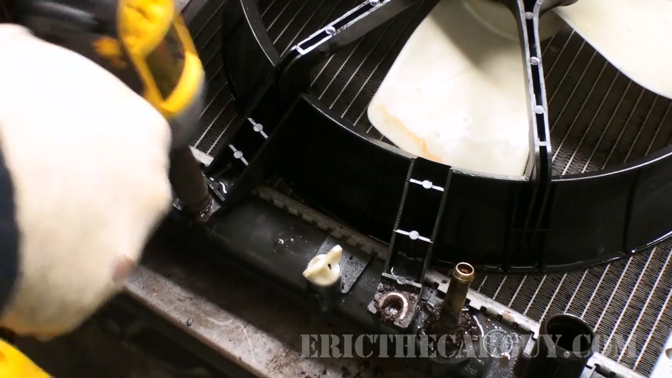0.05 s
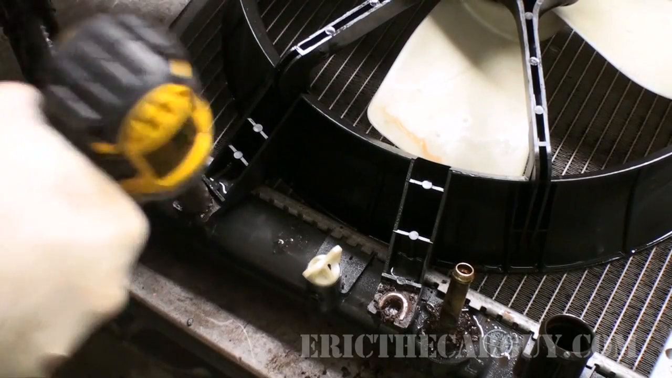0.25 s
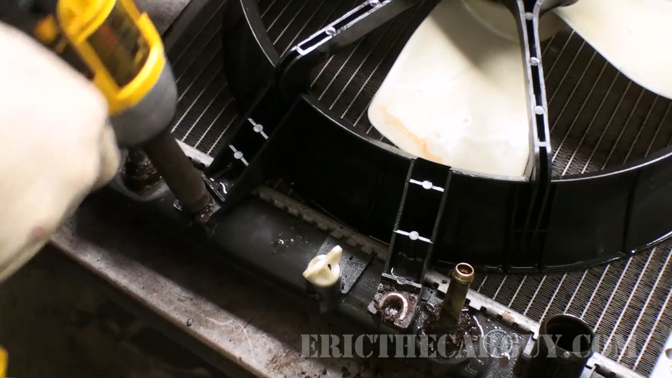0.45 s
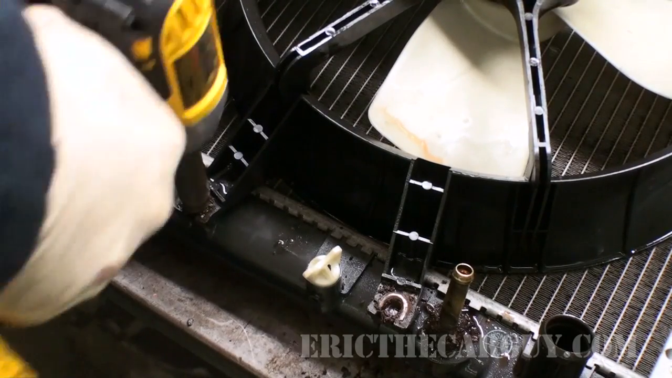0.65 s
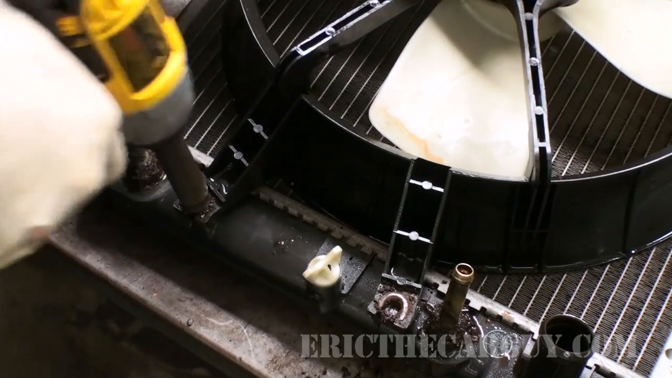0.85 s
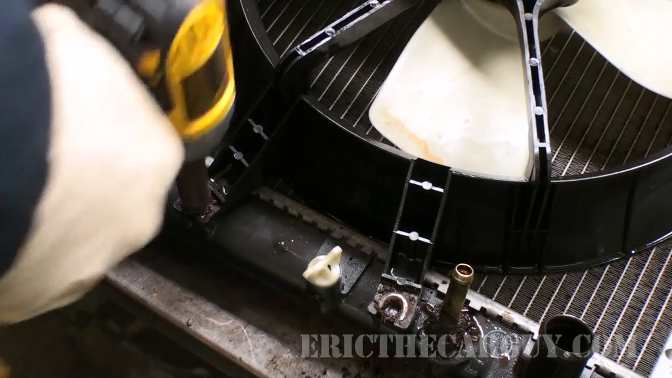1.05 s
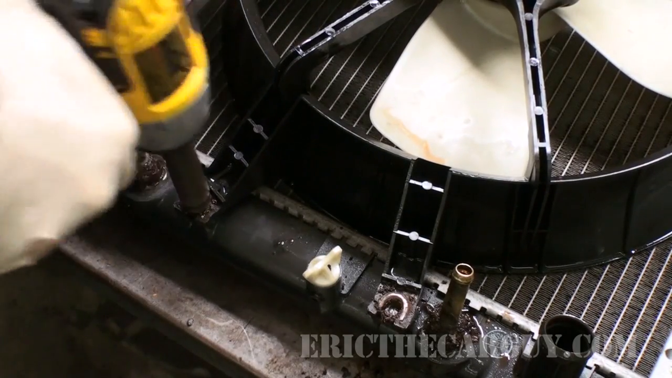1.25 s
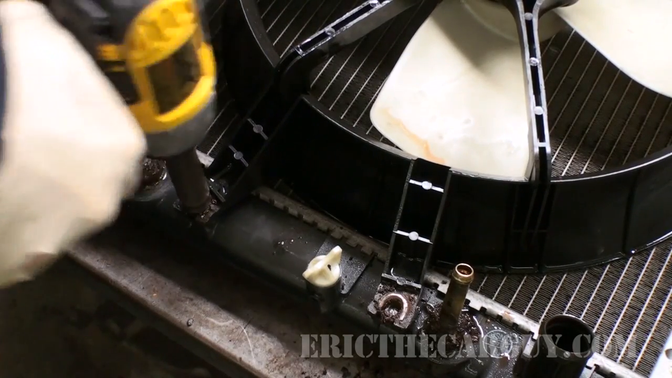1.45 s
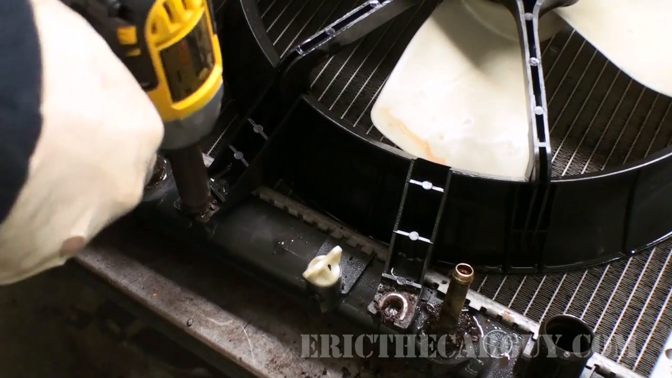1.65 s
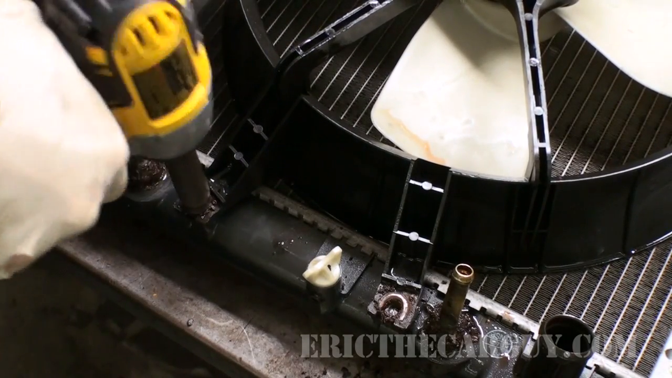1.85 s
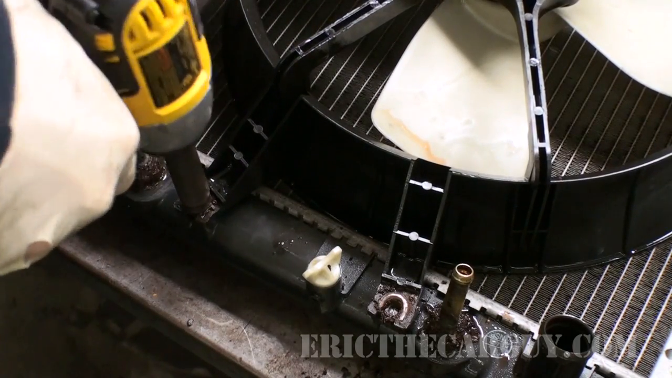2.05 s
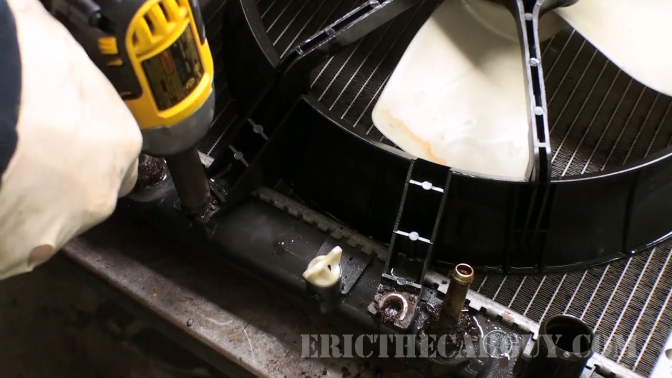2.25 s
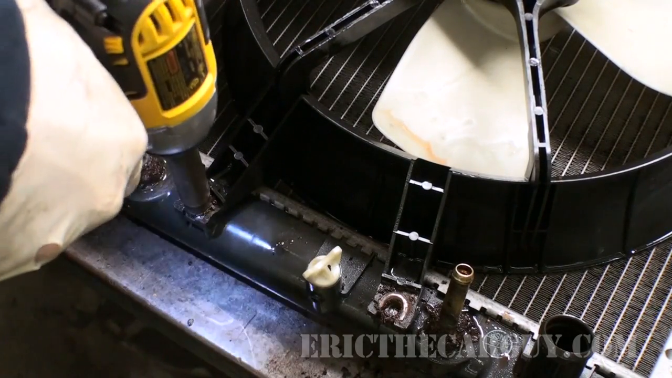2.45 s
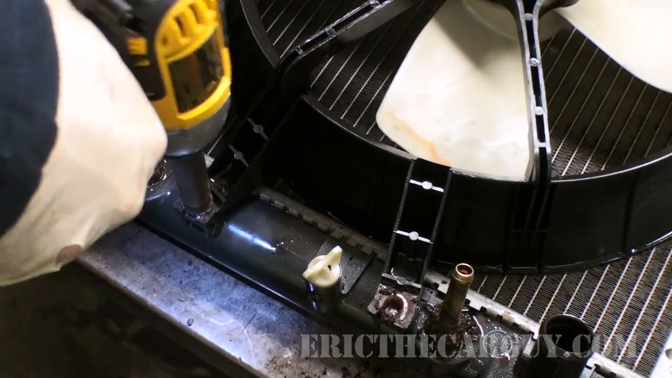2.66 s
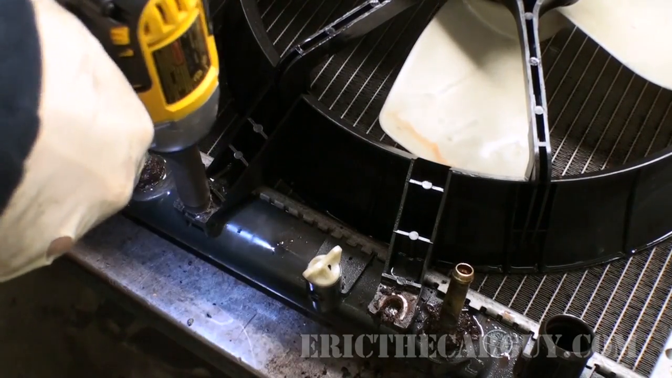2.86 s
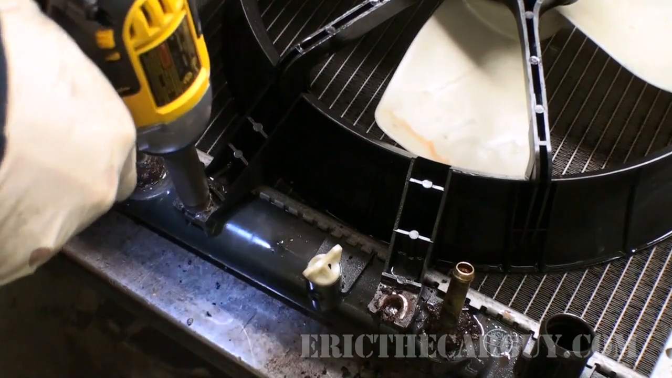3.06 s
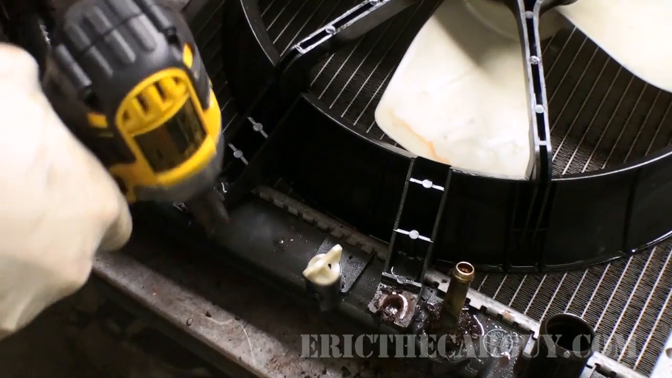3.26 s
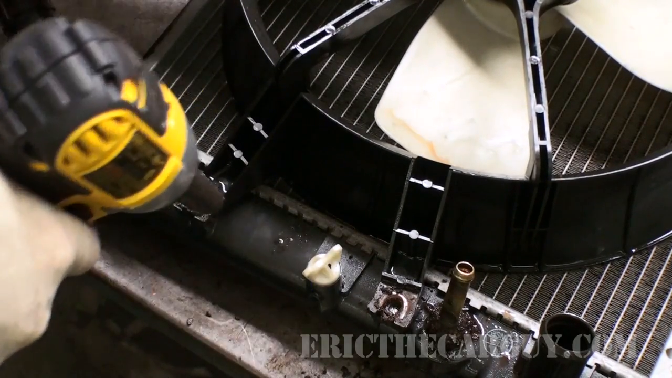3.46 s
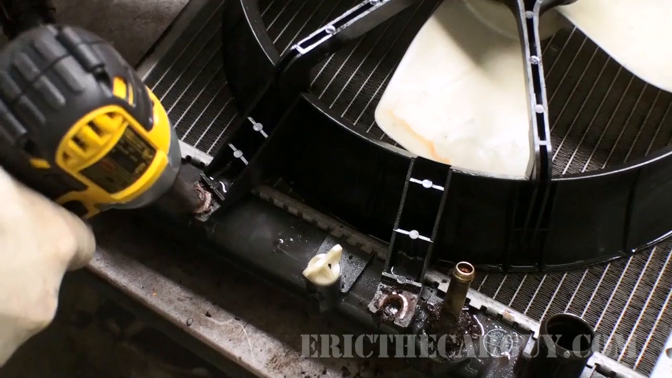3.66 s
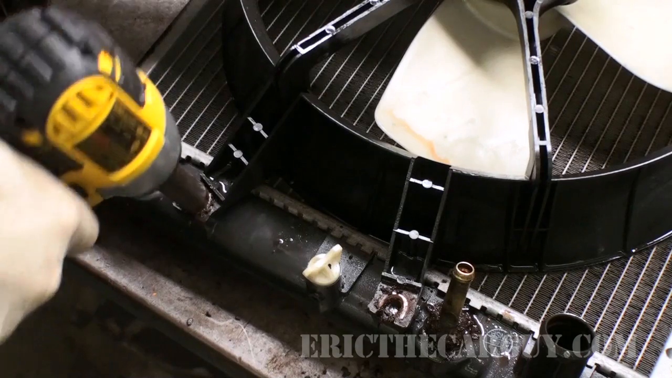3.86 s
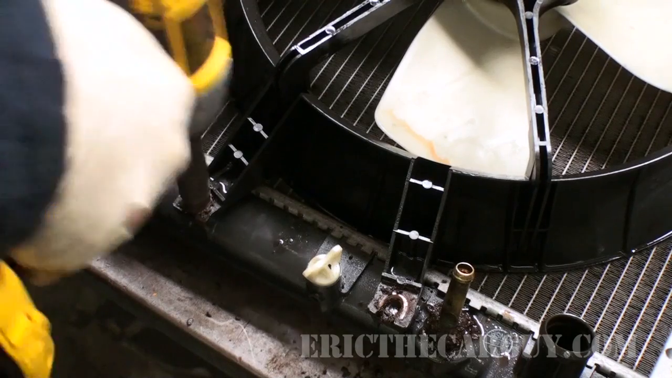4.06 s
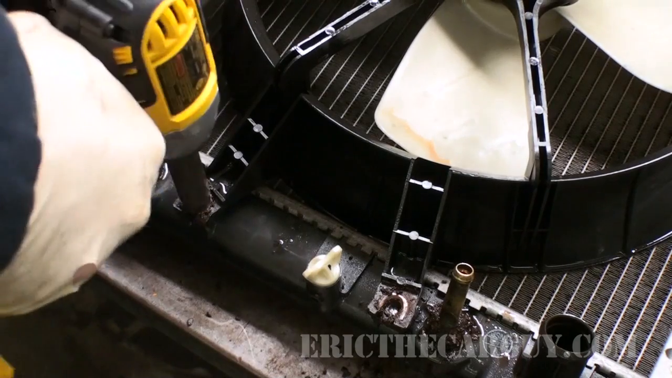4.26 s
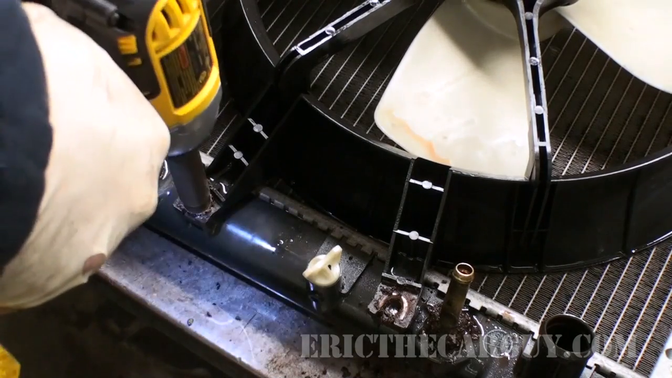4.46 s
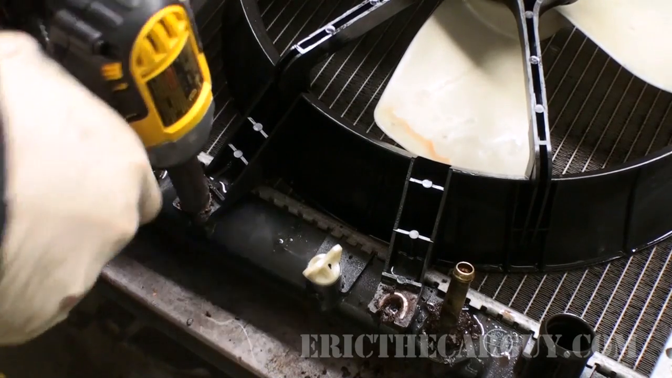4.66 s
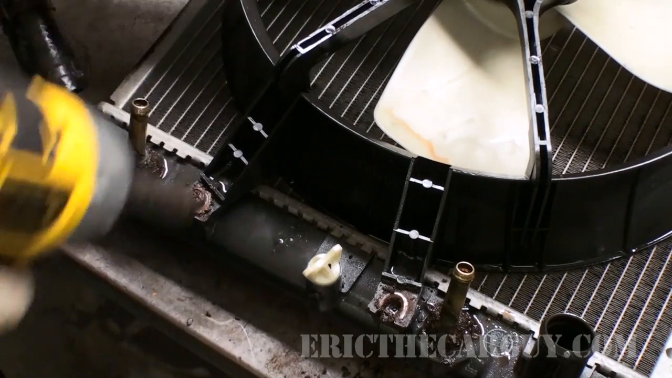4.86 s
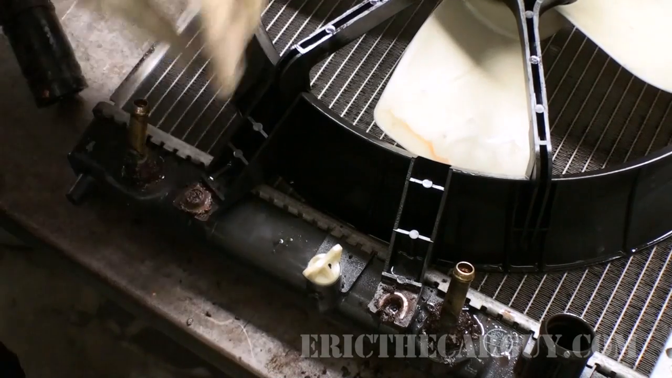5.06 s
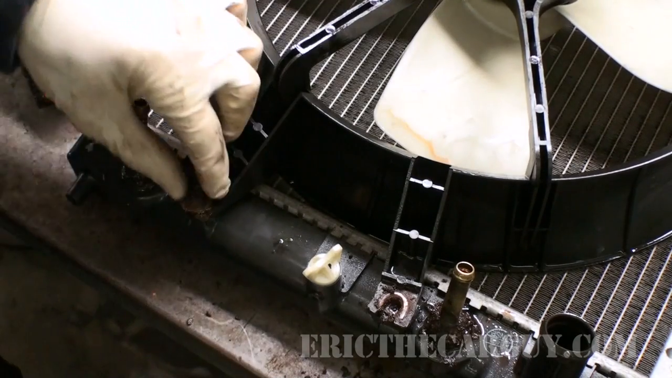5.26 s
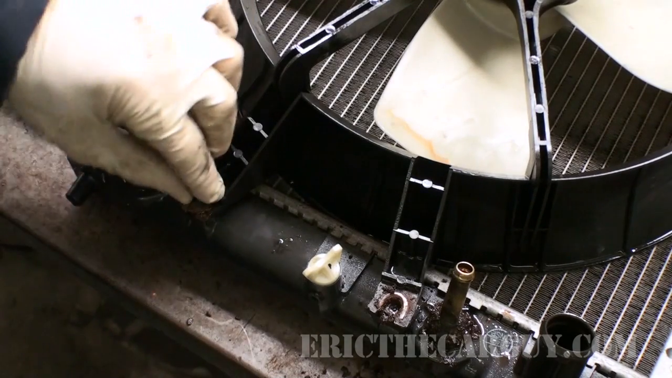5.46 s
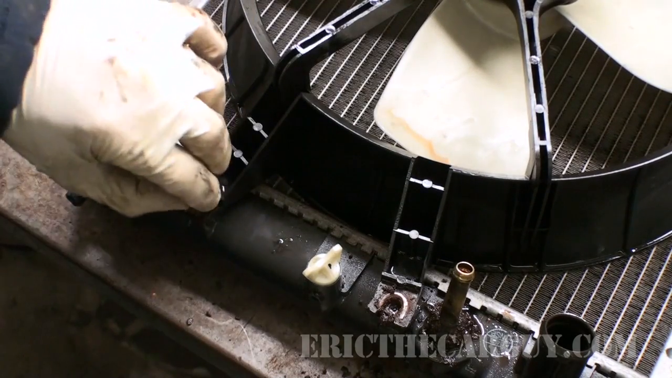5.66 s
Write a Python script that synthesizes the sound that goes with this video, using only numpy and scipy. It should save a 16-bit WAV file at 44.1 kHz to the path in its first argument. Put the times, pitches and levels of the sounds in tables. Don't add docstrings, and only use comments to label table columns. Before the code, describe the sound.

Loose steel clicks and glove rubbing lead to two loud, gear-whining power wrench bursts, echoing through a large hard-walled garage with faint lamp hum.

```python
import sys
import numpy as np
from scipy import signal
from scipy.fft import rfft, irfft
from scipy.io import wavfile
from scipy.ndimage import uniform_filter1d

SR = 44100
rng = np.random.default_rng(int(sys.argv[2]) if len(sys.argv) > 2 else 0)


def invert_db(level):
    return 10 ** (np.asarray(level, dtype=float) / 20)


def bounce(signal):
    frames = np.transpose(np.atleast_2d(signal))
    limited = np.clip(frames, -1, 1)
    pcm = np.round(limited * 32767).astype(np.int16)
    wavfile.write(sys.argv[1], SR, pcm)


N = 252466


def read(points, hz):
    f, value = np.transpose(points)
    return np.interp(np.log(hz + 1), np.log(f + 1), value)


def evened(x):
    return x / np.sqrt(np.mean(x ** 2) + 1e-20)


def tinted(x, points):
    size = x.shape[-1]
    gain = invert_db(read(points, np.fft.rfftfreq(size, 1 / SR)))
    return irfft(rfft(x) * gain, size)


def band(x, lo_hz, hi_hz):
    sos = signal.butter(2, [lo_hz, min(hi_hz, SR / 2.2)], "band", fs=SR, output="sos")
    return evened(signal.sosfilt(sos, x))


def wander(size, hz):
    b, a = signal.butter(2, hz, fs=SR)
    return evened(signal.lfilter(b, a, rng.standard_normal(size)))


def add(mix, s, sound):
    part = mix[round(s * SR):][:len(sound)]
    part += sound[:len(part)]


def floor():
    # (frequency [Hz], level [dB per Hz])
    room_colour = [(15, -23.5), (30, -7.5), (75, -2), (130, -16.5), (200, -17), (400, -23), (1000, -18.5),
                   (1800, -25), (3000, -33), (6000, -36.5), (13000, -39), (16000, -51)]
    # (frequency [Hz], level [dB rms])
    hum_lines = [(120, -57.5), (179, -65.5), (239.5, -47.5), (359, -62), (419, -69.5), (479, -68.5)]
    common, apart = evened(tinted(rng.standard_normal((2, N)), room_colour))
    t = np.arange(N) / SR
    hum = np.zeros(N)
    for hz, db in hum_lines:
        swell = np.sqrt(2) * invert_db(db + 0.91 * wander(N, 2.2))
        hum += swell * np.sin(2 * np.pi * (hz * t + rng.random()))
    return invert_db(-49) * np.array([common + 0.17 * apart, common - 0.19 * apart]) + hum


def rubbing():
    # (time [s], level [dB], clumping [dB])
    spells = [
        [(0.0, -37.5, 1.5), (0.29, -27.5, 1), (0.42, -41.5, 11), (0.64, -36.5, 0.5), (1.31, -40, 4.5),
         (1.63, -45.5, 0.5), (1.85, -46, -5), (2.3, -57.5, -2.5)],
        [(3.7, -48, 5.5), (3.8, -47.5, 0), (4.19, -47, 6), (4.35, -59, 6)],
        [(5.0, -46.5, 2), (5.516, -45, -0.5), (5.72, -44.5, -3.5)],
    ]
    # (frequency [Hz], level [dB per Hz])
    rub_colour = [(88, -27), (150, -15.5), (235, -5.5), (368, -9.5), (422, -4.5), (1120, -11.5),
                  (1790, -10.5), (7920, -19.5), (16000, -38.5)]
    out = np.zeros(N)
    for rows in spells:
        s, db, clump_db = np.transpose(rows)
        start, end = s[0], s[-1]
        t = np.arange(start, end, 1 / SR)
        clumps_db = np.interp(t, s, clump_db) * wander(len(t), 40)
        grains = rng.standard_normal(len(t)) * invert_db(clumps_db + 2 * wander(len(t), 440))
        since_start = t - start + 0.1 * (start == 0)
        until_end = end + 0.1 * (end > 5) - t
        fade = np.clip(np.minimum(since_start, until_end) / 0.04, 0, 1)
        add(out, start, invert_db(np.interp(t, s, db) - 2) * evened(tinted(grains, rub_colour)) * fade)
    return out


def click(s, peak_db, thump_db, sizzle_db, t60, ring_db=0, tick=0.45, rise=0.00036, hold=0):
    # (frequency [Hz], level [dB], time to fall 60 dB [s])
    frame_modes = [(1814.6, -1.5, 0.058), (2577, -0.5, 0.021), (3414, -2.5, 0.024), (4090, -23, 0.0083),
                   (5805, -7, .025), (6980, -6, 0.029)]
    t = np.arange(4500) / SR
    crack, spray, push = rng.standard_normal((3, len(t)))
    slow_fade = 0.722 * invert_db(-60 * np.maximum(t - hold, 0) / max(t60, 0.01))
    quick_fade = tick * invert_db(-60 * t / 0.0079)
    fade = (slow_fade + quick_fade) * np.minimum(t / rise, 1)
    ring = np.zeros(len(t))
    for hz, db, mode_t60 in frame_modes:
        detune, heft_db = rng.uniform(0.97, 1.03), rng.normal(0, 4.5)
        ring += invert_db(db + heft_db - 60 * t / mode_t60) * np.sin(2 * np.pi * hz * detune * t)
    body = band(crack, 1050, 5303) * fade + invert_db(ring_db - 6) * ring
    bright = invert_db(sizzle_db) * band(spray, 5500, 15000) * fade ** 0.71
    thump = invert_db(thump_db - 60 * t / 0.1132) * band(push, 65, 1090) * np.minimum(t / 0.00752, 1)
    return s, invert_db(peak_db - 7.5) * (body + bright + thump)


def socket_clicks():
    # (time [s], peak [dB], thump relative to it [dB], sizzle relative to it [dB])
    hunting = [(0.0004, -18, -10, -10.5), (0.0074, -19, -5.5, -21), (0.0378, -24, -3.5, -14),
               (0.0882, -23, -28.5, -30), (0.1367, -13.5, -10, -40), (0.141, -18, -6.5, -22),
               (0.1482, -17.5, -8.5, -16.5), (0.1599, -18, -8.5, -22), (0.1661, 1, -11.5, -28.5),
               (0.2026, -5.5, -36, -34), (0.276, -36, -15.5, -9.5), (0.3136, -12.5, -16, -11),
               (0.3532, -15, 0, -25.5), (0.4165, -17, -32, -8), (0.422, -32, 8.5, -15),
               (0.4787, -13.5, -18.5, -17), (0.5624, -10, -19, -9.5), (0.5724, -18, -15.5, -8.5),
               (0.6061, -9, -11.5, -16), (0.618, -19.5, 9, -11), (0.632, -11, -12.5, -14.5),
               (0.644, -11, -6, -11.5), (0.7106, -26, -20, -11.5), (0.7791, -21.5, -12.5, -10.5),
               (0.7912, -26.5, -16.5, -13.5), (0.9061, -25, -1.5, -20.5), (0.9668, -22.5, -25.5, -11.5),
               (0.9712, -11, -28, -17.5), (0.9994, -18.5, -4.5, -12.5), (1.0338, -17, -2.5, -25.5)]
    seating = [(1.1165, -37.5, -15.5, -9.5), (1.137, -39.5, -14.5, 3), (1.207, -29, -21, -9),
               (1.2401, -9.5, -5, -10), (1.2517, -25, -22, -9.5), (1.259, -18.5, -10.5, -17.5),
               (1.2774, -24.5, -9, -19.5), (1.3267, -36, -7.5, -16), (1.3456, -24, -13, -6.5),
               (1.3864, -31.5, 8.5, -13), (1.4534, -28, -20.5, -9), (1.4592, -21.5, -31.5, -4.5),
               (1.5266, -23, -8, -27), (1.6465, -29, -17.5, -8.5), (1.6849, -29.5, -1.5, -23),
               (1.8014, -37.5, 8.5, -12.5), (1.8123, -32.5, 2.5, -26), (1.8869, -24, -11.5, -22),
               (1.944, -34, -0.5, -19.5), (1.9913, -32, -24, -31), (2.097, -43.5, 2.5, -20),
               (2.1319, -40.5, 5, -11), (2.147, -33, -3.5, -8), (2.173, -47, 8, -16)]
    late = [(2.5482, -30, -10, -3.5), (3.743, -10, 3.5, -22), (3.751, -31.5, 14.5, -19),
            (3.805, -20.5, 5, -23.5), (3.851, -28.5, 19, -17.5), (3.862, -40, 21, -22.5),
            (3.985, -38.5, -7.5, -11), (4.0, -38, -3, -8), (4.035, -31, 9, -11), (4.057, -25, -20, -10),
            (4.068, -32, -7.5, 1), (4.093, -28.5, -6, -8), (4.163, -28, 5, -6), (4.268, -32.5, -5.5, -16.5),
            (4.318, -40, 2, -8), (4.3725, -23.5, -4, -20.5), (5.268, -36, -15, -0.5)]
    out = np.zeros(N)
    for rows, t60 in (hunting, 0.0728), (seating, 0.0674), (late, 0.05):
        for row in rows:
            add(out, *click(*row, t60, ring_db=-1))
    return out


def squeak():
    # (time [s], level [dB])
    swell = [
        (0.861, -66),
        (.93, -54.5),
        (1.02, -56),
        (1.14, -60),
        (1.2, -74.5),
    ]
    s, db = np.transpose(swell)
    level_db = np.interp(np.arange(N) / SR, s, db, -120, -120)
    return invert_db(level_db) * band(rng.standard_normal(N), 11600, 12400)


def gear_bite_db(t):
    # (start [s], end [s], gear noise [dB], rise [dB per ms])
    bites = [
        (2.574, 2.702, -22, 1.52),
        (2.581, 2.599, -10.5, 5),
        (2.727, 2.786, -13, .5),
        (2.803, 2.838, -20.5, 1),
        (2.84, 3.085, -13.5, 1.2),
        (3.097, 3.185, -12, 0.35),
        (3.2, 3.204, -19, 0.5),
        (4.408, 4.76, -17.5, 0.89),
        (4.417, 4.749, -15, 3.5),
    ]
    power = np.zeros(len(t))
    for start, end, db, rise in bites:
        before_db = np.maximum(1000 * rise * (start - t), 0)
        after_db = np.maximum(1000 * 0.98 * (t - end), 0)
        power += invert_db(db - before_db - after_db) ** 2
    return 10 * np.log10(power + 1e-12)


def voices_db(t):
    # (start [s], end [s], lift [dB])
    glows = [
        [(2.585, 2.604, 11), (2.705, 2.73, 10.5), (3.04, 3.17, 10.5), (4.41, 4.5, 12.5), (4.54, 4.7, 9)],
        [(2.7, 2.79, 13.5), (2.812, 2.84, 15.5), (2.84, 3.06, 12.5), (4.41, 4.46, 5), (4.5, 4.57, 15),
         (4.58, 4.7, 11)],
        [(2.96, 3.04, 13.5), (3.08, 3.17, 12.5), (4.52, 4.6, 12), (4.62, 4.69, 12.5)],
        [(3.05, 3.1, 8.5), (4.4, 4.45, 13.5), (4.5, 4.53, 13), (4.55, 4.69, 10)],
        [(2.715, 2.82, 7.5), (2.89, 3.07, 7), (3.21, 3.23, 9.5), (4.37, 4.4, 8), (4.43, 4.71, 6.5),
         (4.77, 4.79, 16.5)],
    ]
    dim_db = [-6.5, -7, -8.5, -9, -13]
    levels_db = []
    for dim, rows in zip(dim_db, glows):
        lifts_db = []
        for start, end, db in rows:
            inside_s = np.minimum(t - start, end - t)
            lifts_db.append(db * np.clip(1 + inside_s / 0.0257, 0, 1))
        levels_db.append(dim + np.max(lifts_db, axis=0))
    return levels_db


def motor(rows):
    # (multiple of gear mesh [-], level [dB], number of its voice once rounded [-])
    whine_orders = [(1, -17, 0.5), (2, -9.5, 0.5), (2.763, -12, 2), (3, -8.5, 3), (4, -12.5, 1),
                    (5, -18.5, 1), (6, -18.5, 0.5), (7, -19, 0.5), (8, -23.5, -0.5), (9, -22, -0.5)]
    # (multiple of the motor shaft [-], level [dB])
    shaft_orders = [(1, -8), (2, -5.5), (4, -11.5)]
    # (frequency [Hz], width [Hz], lift [dB])
    housing = [(1788, 230, 12), (3700, 1600, 3), (4570, 500, -1), (6744, 2700, 4), (8550, 2630, 8.5),
               (9500, 800, 3)]
    # (frequency [Hz], level [dB per Hz])
    gear_colour = [(410, -26), (700, -6.5), (1440, -5), (1750, -3.5), (2770, -6), (4860, -10.5),
                   (6150, -12), (6740, -12.5), (7690, -15), (8650, -15.5), (16000, -24.5)]
    # (frequency [Hz], level [dB per Hz])
    growl_colour = [(24, -67.5), (40, -25.5), (189, -3.5), (302, -0.5), (379, -7.5), (443, -2), (750, -4.5),
                    (1200, -8), (1560, -21.5), (2640, -120)]
    teeth, carrier_ratio = 9, 5.6
    s, speed = np.transpose(rows)
    t = np.arange(s[0], s[-1], 1 / SR)
    size = len(t)
    *whine_voices_db, growl_db = voices_db(t)

    mesh_hz = uniform_filter1d(np.interp(t, s, speed), size=900, mode="nearest")
    mesh_hz = mesh_hz * (1 + 0.0065 * wander(size, 180))
    turns = np.cumsum(mesh_hz) / SR
    turns += 0.017 * np.sin(2 * np.pi * turns / teeth)
    carrier = np.cos(2 * np.pi * turns / teeth / carrier_ratio)

    whine = np.zeros(size)
    for k, db, voice in whine_orders:
        lift_db = sum(d / (1 + (2 * (k * mesh_hz - f) / w) ** 2) for f, w, d in housing)
        flutter_db = 3.5 * wander(size, 120)
        level = invert_db(db - 4.5 + whine_voices_db[round(voice)] + lift_db + flutter_db)
        whine += level * np.cos(2 * np.pi * (k * turns + rng.random()))

    gears = evened(tinted(rng.standard_normal(size), gear_colour))
    gears *= invert_db(1.33 * wander(size, 100) + 1.94 * wander(size, 600))
    hiss = signal.sosfilt(signal.butter(1, 2500, "high", fs=SR, output="sos"), gears)
    gears -= hiss * (1 - invert_db(-6.5 * np.clip(1 - mesh_hz / 900, 0, 1)))
    gears += invert_db(-16.5 + 4.62 * wander(size, 70)) * band(gears, 1506, 2283)

    shaft = np.zeros(size)
    for k, db in shaft_orders:
        shaft += invert_db(db + 0.32 * wander(size, 29)) * np.cos(2 * np.pi * k * turns / teeth)
    growl = evened(tinted(rng.standard_normal(size), growl_colour)) + shaft * (1 + 0.68 * carrier)
    sound = (gears + whine) * (1 + 0.075 * carrier) + invert_db(growl_db - 0.5) * growl
    return s[0], invert_db(gear_bite_db(t)) * sound * signal.windows.tukey(size, 0.01)


def motor_bursts():
    # (time [s], gear mesh speed [Hz])
    speeds = [
        [(2.535, 291.6), (2.6, 1099), (2.7, 1432), (2.8, 1503), (2.96, 1703), (3.04, 1721), (3.14, 1845),
         (3.18, 1788), (3.225, 1504)],
        [(4.371, 297.5), (4.413, 811.9), (4.45, 1325), (4.482, 1568), (4.545, 1724), (4.65, 1707),
         (4.705, 1735), (4.735, 1637), (4.78, 1397)],
    ]
    out = np.zeros(N)
    for rows in speeds:
        add(out, *motor(rows))
    return out


def hammer_blows():
    # (time [s], peak [dB], thump relative to it [dB], sizzle relative to it [dB])
    blows = [(2.578, 0.5, -14.5, -18), (2.6066, 1, -20.5, -23), (2.6146, 1.5, -16.5, -15.5),
             (2.631, 0.5, -20, -21.5), (2.6384, 0.5, -17.5, -9), (2.6609, -0.5, -30, -18.5),
             (2.668, 3.5, -28, -8), (2.786, -3.5, -10, -13.5), (2.7928, 0.5, -14.5, -8.5),
             (4.3878, -18, -13, -3), (4.3932, -7, -25.5, -13), (4.4146, -3.5, -14.5, -8.5)]
    out = np.zeros(N)
    for row in blows:
        add(out, *click(*row, t60=0.022, ring_db=-8, tick=0.1, rise=0.00058, hold=0.004))
    return out


def garage(x):
    # (frequency [Hz], time to fall 60 dB [s])
    ring_times = [(100, 0.784), (260, 1.345), (700, 2.326), (1840, 2.386), (4850, 1.295), (12800, 0.43)]
    # (frequency [Hz], level [dB])
    tail_colour = [(100, 15.5), (500, 1), (1800, 1), (4000, -4), (8000, -1), (14000, -3.5)]
    hz, t, z = signal.stft(rng.standard_normal((2, 5 * SR // 2)), SR, nperseg=256)
    fall_db = 60 * t / read(ring_times, hz)[:, None]
    z *= invert_db(read(tail_colour, hz)[:, None] - fall_db) * np.minimum(t / 0.0052, 1)
    tail = signal.istft(z, SR, nperseg=256)[1]
    return signal.fftconvolve(x[None], tail / np.linalg.norm(tail[0]), axes=1)[:, :N]


def scene():
    # (frequency [Hz], level [dB])
    capsule = [(20, -10.5), (50, -1.5), (100, 0), (11000, -0.5), (15000, -4)]
    # (frequency [Hz], left minus right [dB])
    lean_points = [(60, .6), (125, 0), (300, -2), (600, -2.3), (1200, -.8), (2500, .3), (8000, .8),
                   (12000, 0)]
    # (frequency [Hz], side minus mid [dB])
    width_points = [(40, -16.5), (150, -31), (300, -22.5), (600, -14.5), (1200, -14), (2500, -15.5),
                    (5000, -20.5), (9000, -15.5), (11000, -11), (14000, -42)]
    hand = rubbing() + socket_clicks() + squeak()
    wrench = motor_bursts() + hammer_blows()
    near = tinted(hand + invert_db(7.5) * wrench, capsule)

    echo = rng.standard_normal(800) * invert_db(-60 * np.arange(800) / SR / 0.023)
    reflected = signal.oaconvolve(near, echo / np.linalg.norm(echo))[:N]
    side = tinted(reflected, width_points) * invert_db(0.5)
    lean = np.array(lean_points) * [1, 0.5]
    close = np.array([tinted(near, lean) + side, tinted(near, lean * [1, -1]) - side])

    mid_tail, side_tail = invert_db(-14.5) * garage(near)
    side_tail = tinted(side_tail, width_points) * invert_db(7)
    return close + np.array([mid_tail + side_tail, mid_tail - side_tail]) + floor()


def low_pass(x):
    return signal.sosfilt(signal.butter(12, 15830, fs=SR, output="sos"), x)


def record(dry):
    power = uniform_filter1d((dry ** 2).mean(0), size=400)
    power_db = 10 * np.log10(abs(power) + 1e-12)
    over_db = np.maximum(power_db + 16, 0) * 0.5516
    back_db = np.arange(N) * 1.05 / SR
    duck_db = np.maximum(np.maximum.accumulate(over_db + back_db) - back_db, 0)
    ducked = dry / invert_db(uniform_filter1d(duck_db, size=300))
    capped = 1.242 * np.tanh(ducked / 1.3423)
    return low_pass(capped)


dry = scene()
out = record(dry)
bounce(out)
```